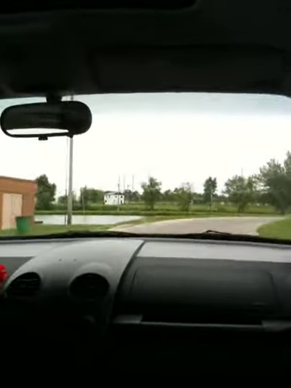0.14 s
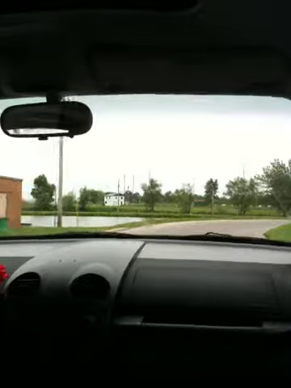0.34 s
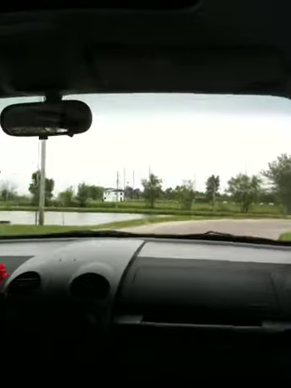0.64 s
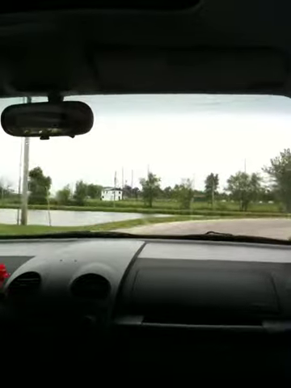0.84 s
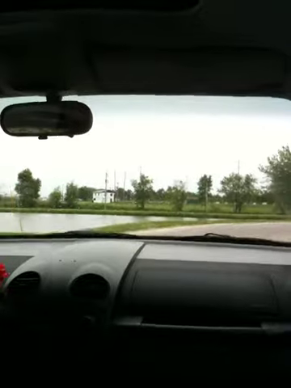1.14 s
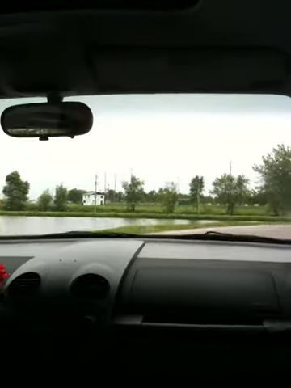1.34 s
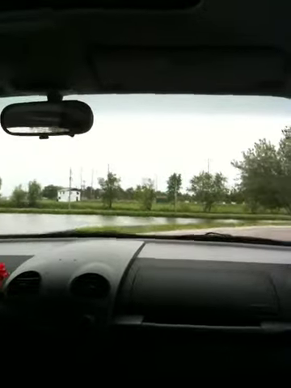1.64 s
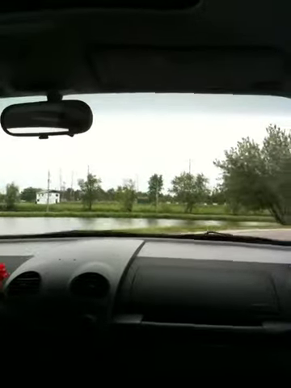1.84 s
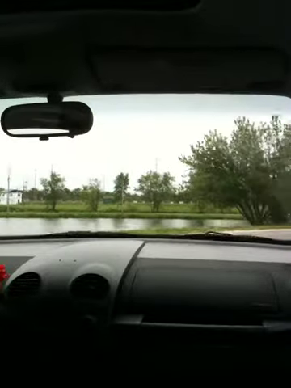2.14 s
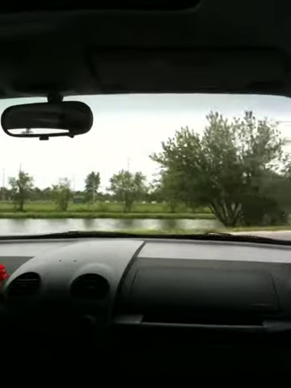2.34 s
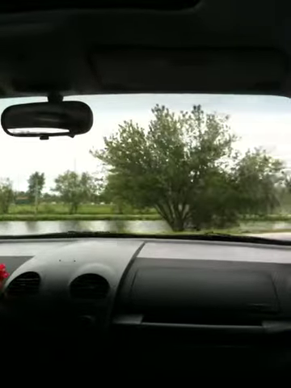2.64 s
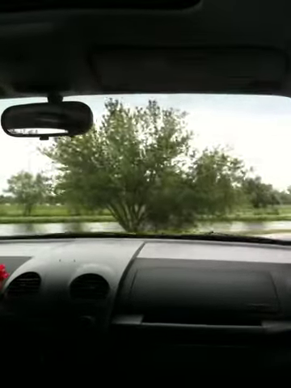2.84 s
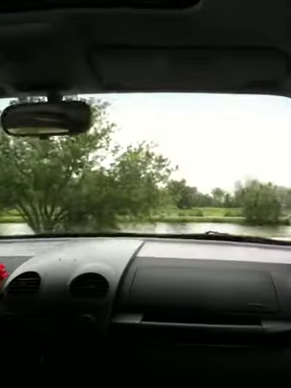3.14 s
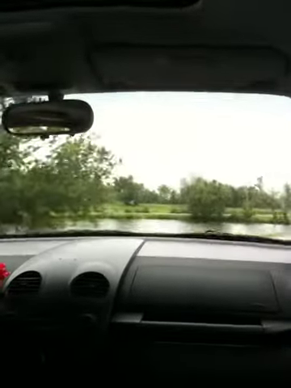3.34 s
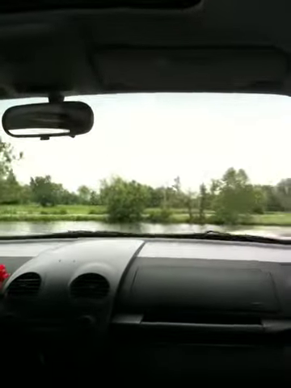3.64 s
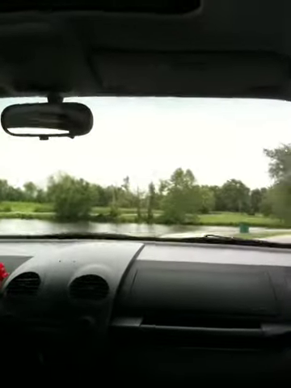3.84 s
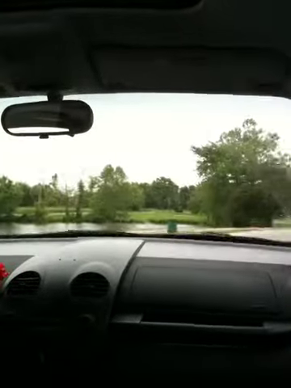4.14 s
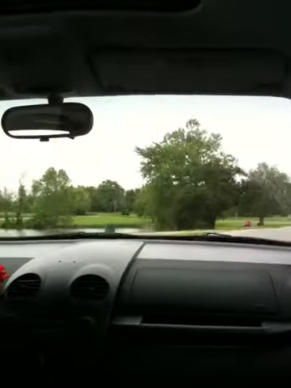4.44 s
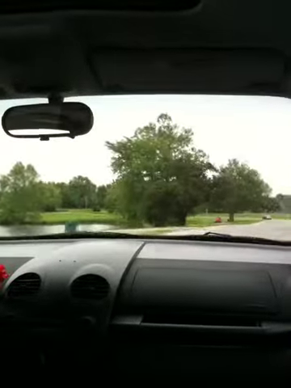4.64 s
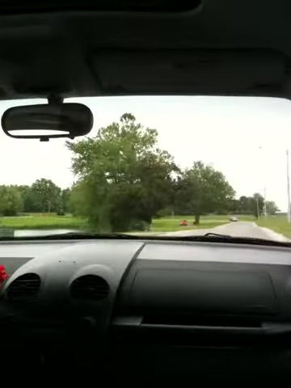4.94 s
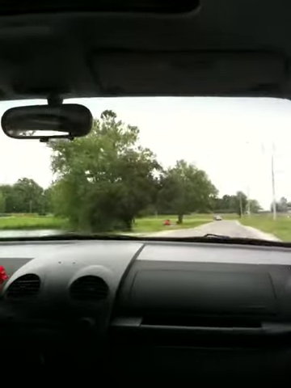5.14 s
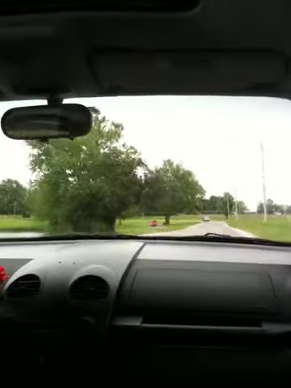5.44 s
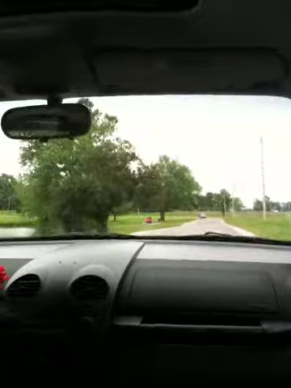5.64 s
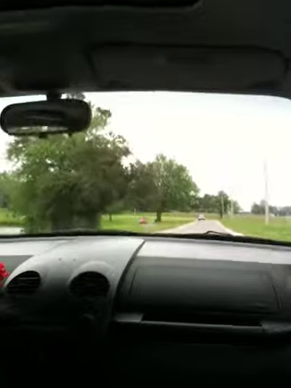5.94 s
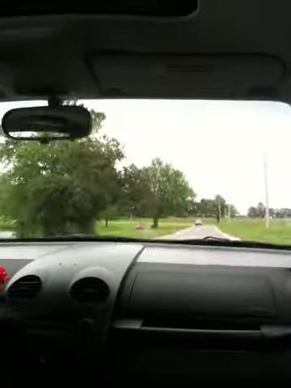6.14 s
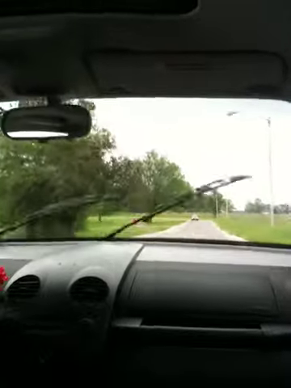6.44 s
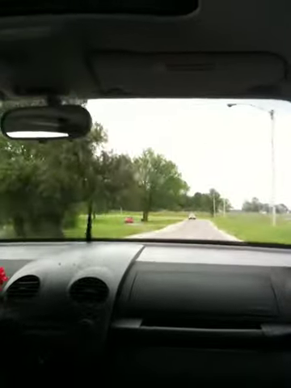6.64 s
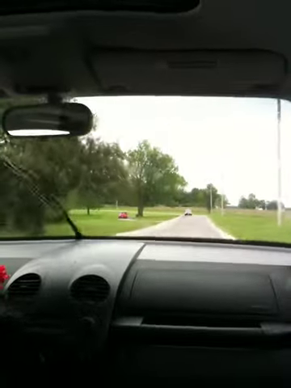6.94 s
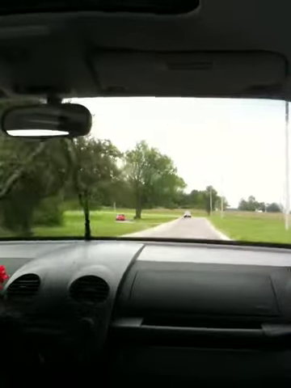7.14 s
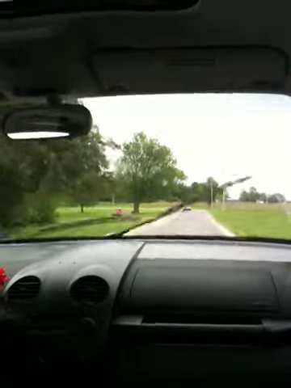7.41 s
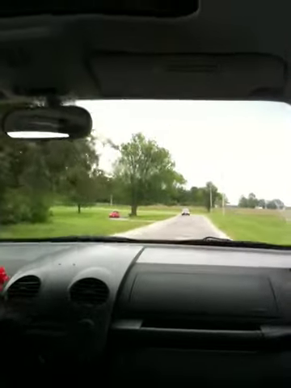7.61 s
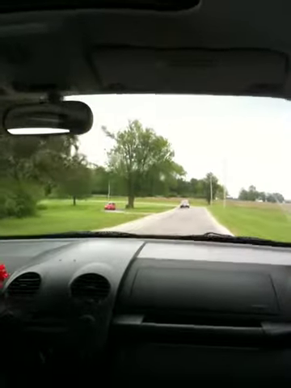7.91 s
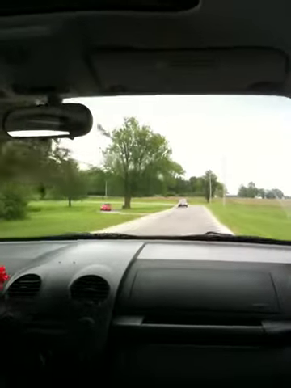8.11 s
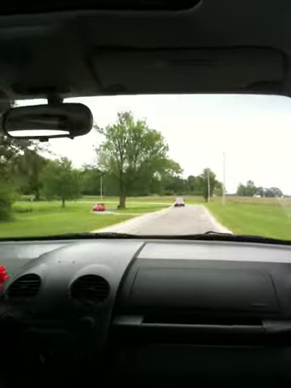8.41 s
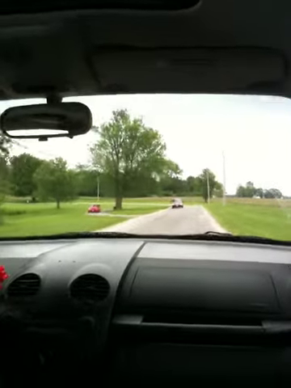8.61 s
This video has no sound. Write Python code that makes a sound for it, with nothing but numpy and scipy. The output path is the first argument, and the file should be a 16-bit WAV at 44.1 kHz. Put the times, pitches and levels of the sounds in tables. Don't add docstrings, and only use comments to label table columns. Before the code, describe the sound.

Close, dry cabin of a small car creeping along a rough road. Thick dull thuds come unevenly, each setting a panel booming briefly and loose plastic ticking in fast bursts. The jolts thin out after two seconds, return near four, then grow densest and hardest around six to eight. Trim creaks, one short scuff, tyre rumble, faint engine hum and light hiss; the small microphone lacks deep bass.

```python
import sys
import numpy as np
from scipy import signal
from scipy.fft import rfft, irfft
from scipy.io import wavfile
from scipy.ndimage import uniform_filter1d

SR = 44100
rng = np.random.default_rng(int(sys.argv[2]) if len(sys.argv) > 2 else 0)


def undo_db(level):
    steps = np.asarray(level, float) / 20
    return 10 ** steps


def unload_wav(signal):
    wavfile.write(
        sys.argv[1],
        SR,
        np.round(np.clip(np.atleast_2d(signal).T, -1, 1) * 32767).astype(np.int16),
    )


N = 386757


def rms_one(x):
    return x / np.sqrt(np.mean(x ** 2) + 1e-20)


def in_time(rows):
    start_s, *columns = np.transpose(rows)
    return [np.interp(np.arange(N) / SR, start_s, column) for column in columns]


def coloured(spectrum):
    hz, db = np.transpose(spectrum)
    bin_hz = np.arange(1, N // 2 + 2) * SR / N
    gain = undo_db(np.interp(np.log(bin_hz), np.log(hz), db, right=-90))
    return rms_one(irfft(rfft(rng.standard_normal(N)) * gain, N))


def drift(rate_hz):
    r = np.exp(-80 * np.pi * rate_hz / SR)
    slow = signal.lfilter([1], [1, -2 * r, r * r], rng.standard_normal(N // 40 + 2002))[2000:]
    return np.interp(np.arange(N) / 40, np.arange(len(slow)), rms_one(slow))


def clicks(start_s, size):
    out = np.full(N, 1e-18)
    at = np.clip((np.asarray(start_s) * SR).astype(int), 0, N - 1)
    np.add.at(out, at, size)
    return out


def ring(x, hz, t60_s):
    r, w = undo_db(-60 / (t60_s * SR)), 2 * np.pi * hz / SR
    return signal.lfilter([0, np.sin(w)], [1, -2 * r * np.cos(w), r * r], x)


def cut(x, hz, kind, order=2):
    return signal.sosfilt(signal.butter(order, hz, kind, fs=SR, output="sos"), x)


def swell(start_s, size, width_s, rise_share=1):
    r, q = np.exp(-1 / (width_s * SR)), np.exp(-1 / (rise_share * width_s * SR))
    fading = signal.lfilter([1], [1, -r], clicks(start_s, size))
    return signal.lfilter([1 - r * q], [1, -q], fading[::-1])[::-1]


def evened(x):
    power = uniform_filter1d(rms_one(cut(x, 280.0, "high")) ** 2, size=256)
    return rms_one(x / np.sqrt(power + .1))


# pitch_hz [Hz], level_db [dB per Hz]
SHUDDER_COLOUR = [(60, -37.5), (150, 12), (300, 0), (600, -11.5), (1000, -25), (1400, -42.5), (2200, -40.5),
                  (3500, -52.5), (7000, -67)]


def shudder_noise():
    return evened(coloured(SHUDDER_COLOUR))


# pitch_hz [Hz], level_db [dB per Hz]
RUB_COLOUR = [(900, 13), (1500, 9.5), (3600, 8), (5200, 2), (6000, -6), (9000, 0), (15000, -9)]


def rub_noise():
    return coloured(RUB_COLOUR)


# pitch_hz [Hz], level_db [dB per Hz]
HISS_COLOUR = [(20, 6), (35, 36), (60, 24.5), (200, 0), (1500, 4.5), (8500, 1.5), (15700, 0.5)]


def hiss():
    return undo_db(-70.5) * coloured(HISS_COLOUR)


# start_s [s], pitch_hz [Hz], level_db [dB]
ENGINE_HUM = [(0, 95, -50), (2.2, 97, -49), (2.82, 99, -42), (3.1, 96, -45), (3.6, 93, -47), (4.2, 86, -45),
              (4.55, 86.5, -39), (5.3, 88.5, -38), (5.85, 92, -40), (6.0, 92, -55), (8.77, 98, -50)]
# multiple [of the hum pitch], level_db [dB]
ENGINE_ORDERS = [(2, -18)]


def engine():
    hz, level_db = in_time(ENGINE_HUM)
    turns = np.cumsum(hz * (1 + 0.0077 * drift(2.08) + 0.008 * drift(9.1))) / SR
    waver_db = 3.5 * drift(8)
    orders = [(1, 0)] + ENGINE_ORDERS
    hum = sum(undo_db(db) * np.sin(2 * np.pi * k * turns) for k, db in orders)
    return np.sqrt(2) * undo_db(level_db + 1 + waver_db) * hum


# start_s [s], level_db [dB]
ROUGHNESS = [(0, -38), (.9, -42.5), (1.6, -42.5), (2.2, -47), (2.9, -48), (3.3, -45), (4.05, -41),
             (4.4, -45), (5.6, -44.5), (5.98, -36), (7.0, -40.5), (7.6, -37.5), (8.05, -40), (8.2, -42.5),
             (8.77, -46)]
# pitch_hz [Hz], level_db [dB per Hz]
TYRE_COLOUR = [(20, -37), (40, -24), (62, -4.5), (90, -3.5), (135, 1), (200, -8.5), (300, -23.5),
               (600, -37.5), (1100, -47), (1800, -57)]


def road():
    rumble_db, = in_time(ROUGHNESS)
    bumps_db = -48 + 1.77 * (rumble_db + 44)
    rumble = undo_db(rumble_db + 4.5 + 2.66 * drift(5.1)) * coloured(TYRE_COLOUR)
    bumps_per_s = 70 * undo_db(3 * drift(14))
    at = np.flatnonzero(rng.random(N) < bumps_per_s / SR)
    size = undo_db(3.5 * np.minimum(rng.exponential(1, len(at)), 1.5))
    bumps = rms_one(swell(at / SR, size, 0.0022) * shudder_noise())
    return rumble + undo_db(bumps_db) * bumps


# start_s [s] of the peak, level_db [dB peak], rise_s [s], fade_s [s]
SCUFF_CONTACTS = [
    (3.535, -56, 0.0018, 0.0071),
    (3.595, -52.5, 0.011, 0.022),
    (3.633, -57.5, 0.0081, .015),
    (3.655, -60, .015, 0.049),
    (3.879, -55, 0.002, 0.012),
    (3.9, -70, 0.014, 0.096),
]


def scuff():
    t = np.arange(N) / SR
    envelope = np.zeros(N)
    for start_s, level_db, rise_s, fade_s in SCUFF_CONTACTS:
        envelope += undo_db(level_db) * np.exp(np.minimum((t - start_s) / rise_s, (start_s - t) / fade_s))
    grain = undo_db(4 + 3.5 * drift(250) + 2 * drift(30))
    return envelope * grain * rub_noise()


CREAK_TIMES = [0.0415, 0.055, 0.1045, 0.7627, 3.8217, 4.2563, 4.961, 5.8509, 5.9413, 6.052, 6.2107, 6.2652,
               6.4364, 6.5032, 6.7299, 7.2739, 7.7364, 7.9342, 7.981, 8.4212]


def creaks():
    snaps = swell(np.array(CREAK_TIMES), undo_db(-54), 0.003, rise_share=0.4)
    return snaps * cut(rub_noise(), 4000.0, "low")


# [dB above thud, if any]
ROAD_JOLTS_1 = [(0.0034, -28, -16, -19), (0.0611, -30.5, 5, -13.5), (0.1161, -18.5, -7),
                (0.1341, -37.5, 6, -9.5), (0.1844, -29.5, 4.5, -32), (0.2451, -28.5, 2.5, -18),
                (0.3263, -21, -2), (0.3703, -30.5, -1), (0.4198, -27, -14), (0.44, -31, -1, -32),
                (0.4776, -33, -0.5), (0.5068, -31.5, 4.5), (0.5352, -24, -6), (0.5548, -29.5, -2, -20),
                (0.5677, -31, -8), (0.5962, -21.5, -5), (0.653, -25.5, 2), (0.7229, -26, 1, -28),
                (0.7533, -31, 5, -21), (0.7736, -26, 3), (0.8042, -25.5, -10), (0.819, -24, -5),
                (0.858, -22, 2, -27), (0.8888, -23, -0.5, -29), (1.0197, -29, -19, -24),
                (1.1037, -20.5, -9), (1.1313, -21.5, 2, -26), (1.1668, -23, 3), (1.2041, -31, -7, -33),
                (1.2459, -22.5, -2), (1.2778, -19.5, -0.5), (1.3103, -27.5, -13, -32),
                (1.3588, -27, 0.5, -27), (1.4046, -30, 3, -24), (1.4445, -30.5, 5, -19),
                (1.5195, -25.5, 5.5, -28), (1.5474, -32.5, 8.5, -14.5), (1.7381, -29, 0.5),
                (1.77, -29, 7, -19), (1.8083, -34.5, 11, -15.5), (1.8388, -30, -1), (1.9614, -24, 1, -28)]
ROAD_JOLTS_2 = [(1.999, -25.5, 0.5), (2.0318, -34.5, 7.5, -17), (2.0456, -39, 7.5, -14),
                (2.2146, -35.5, -4, -32), (2.2412, -38.5, 4.5, -35), (2.4131, -33, 7, -27),
                (2.4396, -32, 6.5, -24), (2.624, -40.5, 6.5, -30), (2.9279, -39, 6, -22),
                (3.0208, -35, 5, -23), (3.044, -34.5, 5.5, -32), (3.0762, -36.5, 7.5, -26),
                (3.23, -34, 7.5, -13), (3.2487, -34.5, 10.5, -18), (3.2648, -36.5, 8, -18),
                (3.326, -29, 3.5, -34), (3.358, -33.5, 4.5, -19), (3.4237, -39.5, 7.5, -19),
                (3.4579, -28, 8, -12), (3.4806, -30, 2, -18), (3.496, -35.5, 5.5, -24),
                (3.5637, -27.5, -3, -16), (3.6067, -24.5, 3.5, -21), (3.6344, -20, 3, -22),
                (3.6598, -24.5, 5, -19), (3.6887, -30.5, 7.5, -22), (3.7393, -25, -3, -26),
                (3.7774, -25, -10, -21.5), (3.8745, -26, -9, -23), (3.9042, -21, 0),
                (3.9419, -21, 1, -22.5), (3.9796, -16.5, -5.5, -29), (4.0135, -20, 1.5, -34),
                (4.0818, -36.5, 10.5, -28), (4.2213, -29.5, 5.5, -18), (4.2622, -20.5, 1.5, -18.5),
                (4.294, -21, 4.5, -22), (4.3993, -32.5, -3, -23.5), (4.5, -36, 5.5, -17.5),
                (4.5712, -36, 6, -22), (4.7837, -42, 9.5, -10.5), (4.852, -38, 5, -26.5),
                (4.9196, -27.5, 3.5, -20.5)]
ROAD_JOLTS_3 = [(4.9386, -25.5, -8), (4.9609, -22, 0.5, -32), (4.9882, -30.5, 8, -20),
                (5.153, -25.5, 0, -29.5), (5.1791, -28.5, 7.5, -16.5), (5.2197, -21.5, 0, -27),
                (5.2484, -25, 7, -25), (5.3481, -28.5, 1, -27), (5.3921, -30, 0), (5.4151, -28, 6, -20.5),
                (5.6876, -29, -19, -25), (5.7044, -28.5, 6.5, -28), (5.7427, -20.5, -8),
                (5.764, -33, 2, -33), (5.8608, -30, -5, -20), (5.8815, -22, 0.5, -33),
                (5.9097, -33, 6.5, -23), (5.9272, -19.5, -1, -23), (5.949, -13.5, -3),
                (5.9693, -20, 3.5, -17), (6.0022, -20, 4.5, -17), (6.0455, -16, 1, -35),
                (6.0623, -36, 4, -20), (6.0915, -25.5, -5, -14.5), (6.133, -19.5, 1.5, -25),
                (6.1658, -19, 2, -28), (6.1964, -15, -1.5, -35), (6.2289, -23, 3, -16.5),
                (6.2803, -25.5, -13, -21), (6.2982, -25.5, -8, -21), (6.3259, -20.5, -9, -14),
                (6.3379, -35.5, 8.5, -22), (6.3708, -21.5, -4, -25.5), (6.4548, -21.5, -8),
                (6.4963, -17, -5.5, -31), (6.5321, -24.5, -15, -18), (6.6087, -17.5, -2, -20.5),
                (6.6361, -21, 3, -17.5), (6.6802, -19, -17, -25), (6.7434, -25.5, 2.5, -18),
                (6.7902, -27, 4, -27), (6.8383, -20.5, -12, -26), (6.8751, -19.5, 0.5, -30.5)]
ROAD_JOLTS_4 = [(6.9111, -35, 11, -13), (6.9584, -26, -7), (6.9718, -25.5, 3.5, -36), (7.0172, -34, 3),
                (7.0321, -24, -2.5), (7.0896, -24.5, -4, -31), (7.2175, -21, -16), (7.2323, -24, 2.5, -33),
                (7.2809, -24, -10, -32), (7.3163, -21, 2, -29), (7.3518, -18, -14, -32),
                (7.3958, -26, 0.5, -27), (7.4395, -20.5, 0.5, -36), (7.507, -19, -3.5, -31),
                (7.5365, -20.5, 0.5, -18.5), (7.5777, -19, -9, -30), (7.615, -21, 0.5, -23.5),
                (7.6648, -16, -13, -25), (7.7008, -22, 4.5, -21), (7.7487, -21.5, -20, -23.5),
                (7.7662, -28, 7, -34), (7.7945, -21, 0.5, -33), (7.8576, -22, 1, -28),
                (7.9049, -16.5, 2, -29.5), (7.943, -23.5, 5, -21), (7.988, -22.5, -9, -21),
                (8.0136, -34, 8.5, -27), (8.0267, -19.5, -20), (8.1096, -22.5, -3),
                (8.2273, -32.5, -8, -34), (8.3698, -31, 6.5, -18), (8.3922, -20, -5), (8.4113, -15, -22),
                (8.4224, -30, 3.5, -22), (8.439, -26.5, 2.5, -26), (8.45, -33, 9.5, -15.5),
                (8.474, -32, 3, -21), (8.4928, -26.5, -11), (8.5362, -30.5, -1), (8.6579, -25, -21),
                (8.714, -29.5, 4.5, -36), (8.7448, -30.5, -11, -24)]
# start_s [s], thud_db [dB]
DRY_TOUCHES = [(0.0109, -20.5), (0.056, -23.5), (0.32, -31.5), (0.714, -34), (1.71, -39.5), (3.384, -42),
               (3.448, -31.5), (3.517, -41), (5.343, -31), (6.266, -30), (6.393, -32), (6.423, -35),
               (6.779, -27.5), (6.83, -28), (6.869, -27), (7.115, -39.5), (7.27, -33.5), (7.309, -27),
               (0.6909, -40), (1.12, -33), (1.2356, -31), (1.301, -33), (1.878, -44), (3.5934, -32),
               (3.8212, -38), (4.2534, -32), (5.9418, -24), (6.054, -28), (6.2094, -33), (6.5651, -39),
               (7.1418, -39), (7.5884, -32), (7.63, -34), (8.3142, -41), (8.4311, -34)]


def jolt_list():
    rows = [(*row, -44)[:4] for row in ROAD_JOLTS_1 + ROAD_JOLTS_2 + ROAD_JOLTS_3 + ROAD_JOLTS_4]
    rows += [(start_s, thud_db, -8, -22) for start_s, thud_db in DRY_TOUCHES]
    start_s, thud_db, boom_db, grit_db = np.transpose(rows)
    return start_s, thud_db + 5.0, -2 + 1.48 * boom_db, grit_db - 1.5


# pitch_hz [Hz], level_db [dB per Hz]
GRIT_NOISE = [(300, 1.5), (700, 11.5), (1100, -4), (2000, -16), (3500, -24.5), (6000, -29)]


def grit():
    start_s, thud_db, _, grit_db = jolt_list()
    envelope = swell(start_s, undo_db(thud_db + grit_db), 0.005, rise_share=0.7)
    return envelope * undo_db(3.0 * drift(260)) * coloured(GRIT_NOISE)


# start_s [s], level_db [dB]
PART_TICKS = [(0.0596, -49.5), (0.1745, -53), (0.1931, -52), (0.2013, -50), (0.2192, -53),
              (0.2271, -50.5), (0.427, -53), (0.527, -57), (0.6088, -49), (0.6171, -45), (0.6624, -46),
              (0.6704, -45.5), (0.8064, -55), (0.8145, -50), (0.881, -51), (0.8896, -42), (0.9093, -53),
              (0.9348, -54), (0.9439, -50), (0.9528, -50), (1.0312, -57), (1.0395, -50.5), (1.1392, -48),
              (1.1473, -48), (1.1564, -48), (1.164, -40), (1.1726, -47), (1.1812, -41.5), (1.1904, -49),
              (1.2567, -51), (1.2658, -55), (1.3008, -45), (1.3091, -45.5), (1.317, -44.5),
              (1.325, -48.5), (1.334, -50.5), (1.5335, -53.5), (2.0046, -50), (2.013, -45.5),
              (2.0765, -52), (2.0855, -57), (3.0423, -51), (3.051, -49), (3.0607, -47.5), (3.0807, -51.5),
              (3.2328, -54), (3.2413, -48), (3.2502, -53), (3.2587, -54), (3.2759, -49), (3.284, -48),
              (3.293, -42.5),
              (3.3128, -53), (3.3483, -42.5), (3.357, -44.5), (3.366, -44), (3.3748, -51), (3.5375, -53),
                (3.6982, -52), (3.773, -56), (3.78, -45), (3.7858, -48), (3.8377, -49.5), (3.8472, -49),
                (3.8667, -53), (3.8809, -45), (3.9441, -49), (4.0216, -50), (4.0978, -52.5), (4.1066, -53),
                (4.132, -53), (4.2466, -49), (4.2654, -50), (4.2734, -47), (4.281, -42), (4.2883, -41.5),
                (4.2955, -40), (4.3022, -37), (4.3102, -44), (4.3183, -42), (4.3266, -44.5), (4.351, -51),
                (4.6419, -56), (4.9159, -47), (4.9223, -45), (4.9768, -48), (4.9842, -40), (4.9918, -41),
                (5.0004, -42), (5.007, -38), (5.0165, -48), (5.031, -54), (5.18, -57), (5.2355, -44.5),
                (5.2428, -39.5), (5.2514, -42), (5.259, -39),
              (5.2662, -42), (5.2746, -56), (5.4147, -46), (5.423, -46), (5.4392, -53), (5.4476, -51),
                (5.7325, -54), (5.7505, -56), (5.7593, -57), (5.7675, -50), (5.7755, -48), (5.8937, -54),
                (5.918, -55), (5.9246, -57), (5.9406, -55), (5.9695, -45), (5.9787, -43), (5.9963, -38),
                (6.0038, -39.5), (6.0074, -39.5), (6.0865, -49), (6.0941, -40.5), (6.0978, -39),
                (6.1432, -50), (6.1528, -52), (6.161, -41.5), (6.168, -39.5), (6.1836, -46), (6.3296, -41),
                (6.338, -48), (6.372, -55), (6.3922, -54), (6.4006, -43), (6.4092, -43), (6.4173, -45),
                (6.4249, -49), (6.4332, -53), (6.4379, -57), (6.4465, -47), (6.5357, -47), (6.6322, -45),
                (6.6396, -39.5), (6.6453, -43), (6.6505, -44), (6.6913, -51), (6.7004, -43),
                (6.7084, -40.5), (6.7173, -44), (6.7257, -46), (6.733, -45), (6.7408, -51), (6.8344, -55),
              (6.9099, -55), (6.9171, -48), (6.9232, -44), (6.9302, -46.5), (6.9548, -52), (6.9999, -55),
                (7.0086, -49), (7.0172, -50.5), (7.0259, -57), (7.1384, -49), (7.1463, -49), (7.1536, -46),
                (7.2363, -44.5), (7.2434, -42), (7.3068, -48), (7.3134, -46), (7.4347, -53),
                (7.4436, -46.5), (7.4531, -51), (7.5374, -43), (7.615, -55), (7.6222, -51.5), (7.692, -40),
                (7.6982, -37), (7.7056, -37), (7.713, -41.5), (7.7855, -47), (7.7936, -43.5), (7.8017, -45),
                (7.8981, -47), (7.9054, -46), (7.9805, -50), (7.9885, -44.5), (8.0005, -49), (8.017, -52),
                (8.3662, -55), (8.3776, -53), (8.435, -47), (8.4425, -37), (8.451, -41), (8.457, -55),
                (8.4651, -45), (8.473, -54), (8.4913, -53), (8.5362, -49), (8.544, -46.5), (8.553, -51),
                (8.562, -47), (8.5704, -46.5), (8.5793, -49), (8.588, -52)]
FAINT_TICKS = [0.1566, 0.2097, 0.3358, 0.4179, 0.4359, 0.5347, 0.6005, 0.6259, 0.7436, 0.8234, 0.9614,
               1.066, 1.2367, 1.3427, 1.4219, 2.0683, 2.4244, 2.4334, 3.3375, 3.4637, 3.8305, 3.9758, 4.028,
               4.1231, 4.2154, 4.3603, 4.3698, 4.3954, 4.444, 4.4964, 4.572, 4.6503, 4.6782, 5.0224, 5.3067,
               5.5161, 6.235, 6.2646, 6.5427, 6.5822, 6.87, 7.171, 7.5302, 7.6643, 7.8103, 7.8695, 8.1069,
               8.4195, 8.4826, 8.759]
# pitch_hz [Hz], level_db [dB], t60_s [s]
PART_MODES = [(2220, -12.5, 0.011), (2420, -11, 0.0058), (3520, -18.5, 0.0069), (4500, -10.5, 0.0046),
              (5050, -9.5, 0.0021), (7825, -3.5, 0.0017), (8700, 2, 0.0019), (9440, -2, 0.0017),
              (12200, -17, 0.002), (13100, -17, 0.002)]


def rattle():
    rows = PART_TICKS
    rows = rows + [(at, -59) for at in FAINT_TICKS]
    start_s, level_db = np.transpose(rows)
    chance = rng.standard_normal((len(start_s), 5))
    colour_db = 2.5 * rng.standard_normal((len(start_s), len(PART_MODES)))
    colour_db[:, 5:8] *= .3
    colour_db[:, :2] -= .35 * (level_db[:, None] + 54)
    hard = np.clip((level_db + 43) / 7, 0, 1)
    rebounds = np.zeros(N)
    for k in (1, 2):
        later_s = start_s + k * .0016 * undo_db(1.5 * chance[:, k])
        rebounds += clicks(later_s, hard * undo_db(level_db - 3 * k + 2.5 * chance[:, 2 + k]))
    buzz = swell(start_s + 0.0022, undo_db(level_db - 28.0), 0.0011)
    rebounds += buzz * rng.standard_normal(N)
    ticks = np.zeros(N)
    for k, (hz, db, t60_s) in enumerate(PART_MODES):
        strikes = clicks(start_s, undo_db(level_db + colour_db[:, k])) + rebounds
        ticks += (-1) ** k * undo_db(db) * ring(strikes, hz, t60_s)
    edge = clicks(start_s, undo_db(level_db + 4 * hard)) + .5 * rebounds
    crack = undo_db(-9) * cut(edge, 14200.0, "high")
    return undo_db(10.0) * cut(ticks + crack, 1500.0, "high")


def thuds(start_s, size, hardness):
    hard_hits = clicks(start_s, size * hardness)
    soft = cut(clicks(start_s, size * (1 - hardness)), 407.0, "low", order=5)
    hard = cut(hard_hits, 624.0, "low", order=5)
    knock = ring(cut(hard_hits, 624.0, "low"), 345.0, 0.03)
    return undo_db(36.5) * (soft + undo_db(-18) * hard) + undo_db(-10) * knock


# pitch_hz [Hz], level_db [dB], t60_s [s]
PANEL_MODES = [
    (120, -13, 0.045),
    (134.4, -7.5, 0.58),
    (144.3, 2, 0.19),
    (155, 5.5, 0.052),
    (201.6, -9.5, 0.1),
]


def jolts():
    start_s, thud_db, boom_db, _ = jolt_list()
    chance = rng.random((len(start_s), 2))
    strike = rng.standard_normal((len(start_s), len(PANEL_MODES)))
    size = undo_db(thud_db) * np.sign(chance[:, 0] - .5)
    push = thuds(start_s - .0012, size, chance[:, 1])
    quick = swell(start_s - .001, undo_db(thud_db), 0.004, rise_share=0.8)
    lingering = swell(start_s + 0.0073, undo_db(thud_db - 17.5), 0.013)
    shudder = undo_db(-9) * (quick + lingering) * shudder_noise()
    boom = np.zeros(N)
    for k, (hz, db, t60_s) in enumerate(PANEL_MODES):
        strike_db = boom_db + db - 11.5 + 2.7 * strike[:, k]
        boom += ring(clicks(start_s, size * undo_db(strike_db)), hz, t60_s)
    return cut(push + shudder + cut(boom, 208.0, "low"), 112.0, "high", order=3)


def scene():
    return (engine() + road() + scuff() + creaks() + grit() + rattle() + jolts())[None]


def starved(x, below_db):
    treble = x - signal.sosfiltfilt(signal.butter(4, 3000, fs=SR, output="sos"), x)
    padded = np.pad(treble[0] ** 2, (255, -(N + 255) % 1024))
    power = padded.reshape(-1, 8, 128).mean(axis=2)
    lost = power < undo_db(-2 * below_db) * power.max(axis=1, keepdims=True)
    loss = uniform_filter1d(np.repeat(lost * 1., 128), size=64)[255:N + 255]
    return x - .8 * loss * treble


def low_pass(x):
    return signal.sosfilt(signal.butter(12, 15840, fs=SR, output="sos"), x)


def record(dry):
    t = np.arange(N) / SR
    under_way = 0.14 * np.cos(2 * np.pi * 103.0 * t) * undo_db(-60 * t / 0.073)
    mic = cut(cut(dry, 92.6, "high"), 73.5, "high") + under_way
    rounded = cut(.5 * np.tanh(mic / .5), 15500, "low", order=16)
    mix = starved(rounded + hiss(), below_db=18)
    return low_pass(mix)


dry = scene()
out = record(dry)
unload_wav(out)
```